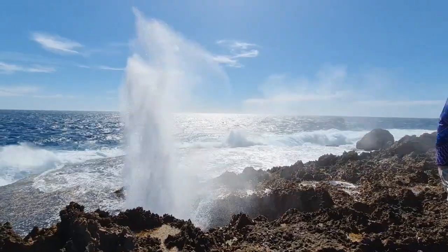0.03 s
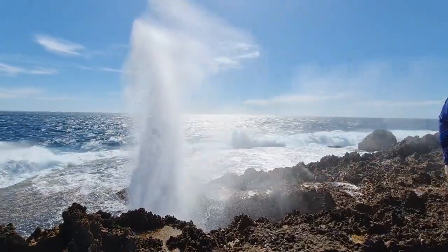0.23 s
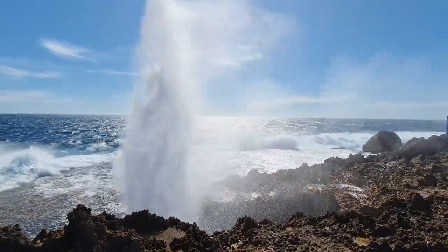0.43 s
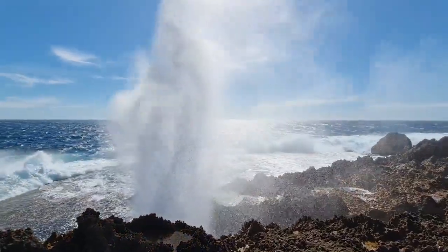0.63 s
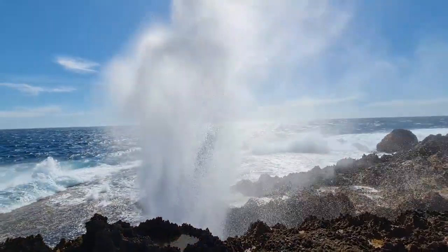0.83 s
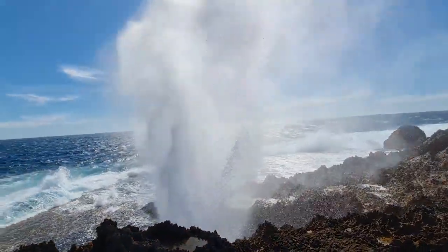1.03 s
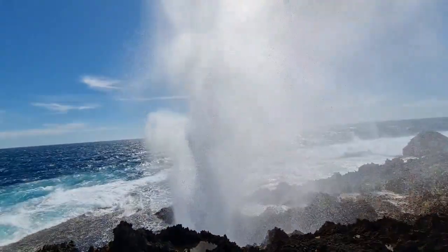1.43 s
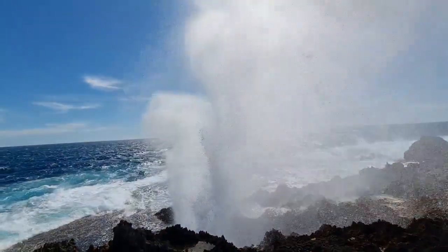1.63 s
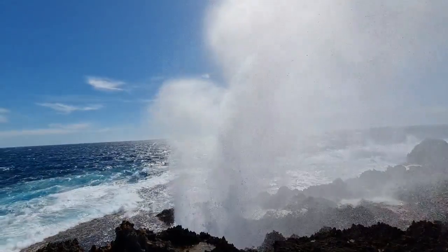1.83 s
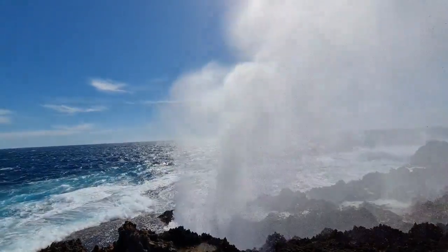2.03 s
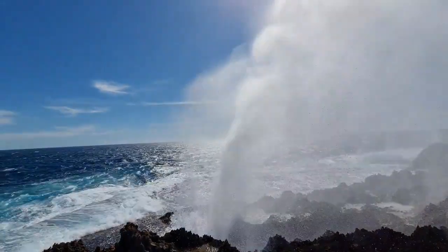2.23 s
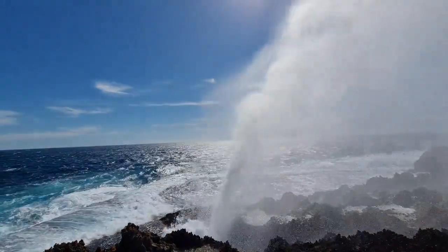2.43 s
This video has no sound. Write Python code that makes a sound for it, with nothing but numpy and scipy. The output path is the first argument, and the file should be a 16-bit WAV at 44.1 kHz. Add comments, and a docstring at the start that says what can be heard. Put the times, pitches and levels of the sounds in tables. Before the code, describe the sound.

A blowhole on a rocky shore throbs hollowly and hisses, then bellows out a roaring jet of spray. Water splashes back onto the rocks, while surf washes steadily and wind buffets the microphone.

```python
"""Rocky shore with a blowhole. Slugs of air and water ring the shaft in hollow throbs and air
hisses through cracks; then the hole bellows and fires a roaring jet of spray. Water gushes,
slaps and falls back on the rocks, and air squeals through it as it drains. Mist hisses over
steady surf throughout, while wind buffets the two ports of the microphone."""
import sys
import numpy as np
from scipy import signal
from scipy.fft import rfft, irfft
from scipy.io import wavfile
from scipy.ndimage import uniform_filter1d

SR = 44100
rng = np.random.default_rng(int(sys.argv[2]) if len(sys.argv) > 2 else 0)


def persist_wave(psi):
    """Save psi, clipped to +-1, as 16-bit WAV."""
    counts = np.round(np.clip(psi, -1, 1) * 32767).astype(np.int16)
    wavfile.write(sys.argv[1], SR, np.atleast_2d(counts).T)


N = 114660
TIME_S = np.arange(N) / SR

# near-zero curve for coherence, phase or balance: freq_hz, value
NEAR_ZERO = [(20, 0.011), (16000, 0.012)]
# left-right likeness of the shore's noises: freq_hz, coherence
SHORE_COHERENCE = [(100, 0.96), (350, 1), (700, 0.054), (1100, 0.13), (1700, 0.2), (2600, 0.28),
                   (4000, 0.083), (9000, .05)]
# stereo lean of rising and falling spray: freq_hz, left_minus_right_db
SPRAY_BALANCE = [(200, 10), (700, 7), (1100, -0.5), (1700, 3.5), (3000, 1), (5500, 2.5), (6700, 11),
                 (7900, 15), (9500, 12), (13000, 4)]


def amp(db):
    return 10 ** (np.asarray(db) / 20)


def unit_rms(x):
    return x / np.sqrt(np.mean(x ** 2) + 1e-20)


def at_freq(curve, hz):
    freq_hz, value = np.transpose(curve)
    return np.interp(np.log(hz + 1), np.log(freq_hz + 1), value)


def envelope(curve):
    """Gain over time for each dB column."""
    time_s, *columns_db = np.transpose(curve)
    return amp([np.interp(TIME_S, time_s, db) for db in columns_db])


def swell(length_s):
    return np.sin(np.pi * np.arange(0, length_s, 1 / SR) / length_s) ** 2


def add(mix, start_s, sound):
    part = mix[:, max(round(start_s * SR), 0):][:, :sound.shape[1]]
    part += sound[:, :part.shape[1]]


def colour(x, spectrum):
    """Filter by a spectrum, to unit RMS."""
    gain = amp(at_freq(spectrum, np.fft.rfftfreq(N, 1 / SR)))
    return unit_rms(irfft(rfft(x) * gain, N))


def steadied(x, samples):
    """Hold the running RMS near one."""
    power = uniform_filter1d(uniform_filter1d(x ** 2, samples), samples)
    return x / np.sqrt(power + 1e-12)


def drone(spectrum, coherence):
    """Stereo noise of even strength."""
    left, other = rng.standard_normal((2, N))
    right = coherence * left + np.sqrt(1 - coherence ** 2) * other
    return steadied(colour(np.array([left, right]), spectrum), samples=2600)


def rush(spectrum, coherence, patchy_db, flicker_db, phase=NEAR_ZERO, balance=NEAR_ZERO):
    """Turbulent stereo noise with drifting patches and a flicker shared by all bands."""
    frames, hz = N // 128 + 6, np.fft.rfftfreq(512, 1 / SR)
    a, b, c, d, patches = rng.standard_normal((5, frames, len(hz)))
    patches = unit_rms(uniform_filter1d(uniform_filter1d(patches, 12, axis=0), 6, axis=1))
    flicker = rng.standard_normal(frames)
    flicker = unit_rms(uniform_filter1d(flicker, 5) - uniform_filter1d(flicker, 40))
    alike = np.clip(at_freq(coherence, hz), -1, 1)
    left, other = a + 1j * b, c + 1j * d
    right = (alike * left + np.sqrt(1 - alike ** 2) * other) * np.exp(-1j * at_freq(phase, hz))
    lean = amp(at_freq(balance, hz) / 2)
    bins = np.array([left * lean, right / lean]) / np.hypot(lean, 1 / lean)
    bins *= amp(patchy_db * patches + flicker_db * flicker[:, None])
    _, noise = signal.istft(bins.transpose(0, 2, 1), nperseg=512, noverlap=384)
    return colour(noise[:, :N], spectrum)


def wind():
    """Lumpy eddies rumble on each port; a buffet is one rough swing of pressure on both."""
    # eddy and buffet-grit spectra: freq_hz, density_db
    eddy_spectrum = [(15, -34), (35, -6.5), (60, -6.5), (120, -1), (180, -9), (300, -12.5), (500, -17),
                     (900, -31.5), (2500, -89)]
    grit_spectrum = [(15, -22), (35, -11), (60, -2.5), (115, -12.5), (180, -19.5), (400, -21), (900, -30),
                     (2500, -90)]
    # eddy strength: time_s, left_db, right_db
    eddy_levels = [(0, -24, -48), (.09, -25.5, -36), (.28, -29, -28), (.39, -19.5, -32), (.44, -28, -38),
                   (.53, -30.5, -26), (.7, -27.5, -46), (.84, -27, -25.5), (1.0, -30, -19.5),
                   (1.1, -53, -34.5), (1.35, -29.5, -19), (1.6, -25, -26.5), (1.78, -22, -25),
                   (2.0, -40, -23.5), (2.25, -31, -24), (2.34, -22, -31), (2.45, -45, -31),
                   (2.6, -40, -35.5)]
    # single buffets: centre_s, left_db, right_db
    buffet_events = [(0.096, -32, -27), (0.398, -29, -27), (0.482, -28, -25.5), (0.818, -21, -24.5),
                     (.864, -23, -29), (1.031, -25, -22), (1.201, -28, -19), (1.262, -32, -23.5),
                     (1.336, -21, -33), (1.381, -23, -15), (1.432, -24, -23), (1.699, -22, -23),
                     (1.805, -26, -25), (1.892, -20, -19), (1.965, -15, -26), (2.023, -19.5, -24),
                     (2.095, -17.5, -20), (2.182, -22, -22), (2.28, -38, -17.5)]
    buffet_s, swing_hz, spread_rad, lump_db = 0.055, 62, 1.4, 3.5
    buffets, shape = np.zeros((2, N)), swell(buffet_s)
    t = TIME_S[:len(shape)]
    grit = steadied(drone(grit_spectrum, coherence=0.17), samples=1100)
    for centre_s, left_db, right_db in buffet_events:
        offset, lag, detune = rng.standard_normal(3)
        phase = 2 * np.pi * (swing_hz * np.exp(0.18 * detune) * t + offset)
        swing = 0.88 * np.sin([phase, phase + spread_rad * lag])
        swing += 1.2 * grit[:, round(centre_s * SR):][:, :len(t)]
        add(buffets, centre_s - buffet_s / 2, amp([[left_db], [right_db]]) * shape * swing)
    lumps = unit_rms(uniform_filter1d(uniform_filter1d(rng.standard_normal((2, N)), 700), 500))
    eddies = unit_rms(drone(eddy_spectrum, coherence=0.091) * amp(lump_db * np.clip(lumps, -2, 2)))
    return eddies * envelope(eddy_levels) + buffets


def surf():
    """Steady wash of the sea."""
    # surf noise: freq_hz, density_db
    spectrum = [(20, -38), (120, -4.5), (330, 1.5), (600, -5), (900, -5.5), (1400, -21), (2200, -26.5),
                (2700, -12.5), (3300, -26.5), (4700, -22.5), (6000, -27), (7200, -44), (9000, -74.5),
                (13000, -34)]
    return amp(-38) * rush(spectrum, SHORE_COHERENCE, patchy_db=2.5, flicker_db=1.74)


def mist():
    """Fine drifting mist hisses in the high treble."""
    # mist hiss: freq_hz, density_db
    spectrum = [(3000, -40), (7000, -16), (9000, -16), (10200, -10), (11500, -2), (13000, -3), (15800, -5)]
    # mist strength: time_s, level_db
    levels = [(0, -60), (.2, -61), (.35, -58), (.7, -58.5), (.9, -56), (1.15, -56.5), (1.45, -52.5),
              (1.84, -56.5), (1.89, -49), (1.94, -55.5), (2.4, -54.5), (2.6, -51.5)]
    # stereo lean: freq_hz, left_minus_right_db
    balance = [(5000, 6), (7900, 15), (10000, 5), (13000, 0.5)]
    return envelope(levels) * rush(spectrum, NEAR_ZERO, patchy_db=-1.7, flicker_db=1.0, balance=balance)


def crack_hiss():
    """Air hisses through cracks in the rock before the eruption."""
    # hiss bands: freq_hz, density_db
    spectrum = [(1300, -30), (1650, 3.5), (1900, 7.5), (2120, -5), (2650, 2.5), (2850, -19), (3050, -26),
                (3700, -13), (4400, -1.5), (4820, 0.5), (5250, -24), (6000, -31), (7500, -29), (9000, -38)]
    # hiss strength: time_s, level_db
    levels = [(0, -58), (.12, -47.5), (.3, -47.5), (.6, -52.5), (.9, -52), (1.3, -66), (2.6, -64)]
    return envelope(levels) * rush(spectrum, SHORE_COHERENCE, patchy_db=3, flicker_db=1.0)


def shaft():
    """Slugs of air and water ring the rock shaft in quick throbs over its hollow hum."""
    # shaft resonance: freq_hz, density_db
    hum_spectrum = [(150, -10), (220, -0.5), (265, 9), (310, 4.5), (420, -11), (700, -49.5)]
    # hum strength: time_s, level_db
    hum_levels = [(0, -33), (.3, -28), (.68, -33.5), (.8, -23.5), (1.15, -27), (1.35, -26), (1.6, -34),
                  (1.9, -27), (2.25, -27.5), (2.6, -39.5)]
    # throbs of air: centre_s, level_db, pitch_hz
    throbs = [(0.075, -27, 272.6), (0.213, -21, 256), (0.256, -17, 267.7), (0.311, -18.5, 267),
              (0.367, -20.5, 256.5), (0.544, -20, 257), (0.622, -23.5, 250), (0.765, -14.5, 257),
              (0.808, -19, 268.7), (0.854, -15.5, 254), (0.906, -13.5, 260.4), (0.976, -30, 273.5),
              (1.281, -19, 277), (1.325, -16.5, 245.3), (1.359, -15, 266), (1.415, -16.5, 268.4),
              (1.474, -14, 263.7), (1.522, -17, 242.8), (1.566, -10, 243.6), (1.62, -10.5, 246),
              (1.691, -18, 255), (1.783, -18.5, 272), (1.873, -20, 273.4), (2.177, -17, 249.5)]
    throb_s, skew, spread_rad = 0.052, 0.94, 0.41
    out = drone(hum_spectrum, coherence=0.17) * envelope(hum_levels)
    progress = np.arange(0, throb_s, 1 / SR) / throb_s
    shape = np.sin(np.pi * progress ** skew) ** 2
    for centre_s, level_db, pitch_hz in throbs:
        offset, lag, glide = rng.standard_normal(3)
        glide_hz = pitch_hz * (1 + 0.16 * glide * (progress - 0.5))
        phase = 2 * np.pi * (np.cumsum(glide_hz) / SR + offset)
        tone = np.sin([phase, phase + spread_rad * lag])
        add(out, centre_s - throb_s / 2, amp(level_db) * shape * tone)
    return out


def splashes():
    """Soft gushes of spray and hard slaps of water on rock, as bursts of one noise."""
    # gushes: centre_s, length_s, level_db, left_minus_right_db
    gushes = [(0.368, .05, -36, -3), (0.861, 0.071, -36.5, -6), (1.082, 0.078, -32, 5),
              (1.205, .04, -33.5, -5), (1.3, .04, -30, 12), (1.89, .06, -30.5, 2), (1.972, 0.036, -24, 3),
              (2.19, .07, -31.5, 8)]
    # slaps: start_s, peak_db
    slaps = [(.744, -26), (.833, -26.5), (1.084, -27), (1.446, -26), (1.957, -24), (2.079, -25)]
    # splash noise: freq_hz, density_db
    spectrum = [(120, -25), (250, 2), (480, 4), (750, 0.5), (1100, -1), (1700, -10), (2400, -13),
                (3500, -24), (5000, -30), (8000, -52), (13000, -53)]
    slap_rise_s = 0.0011
    gain = np.zeros((2, N))
    for centre_s, length_s, level_db, lean_db in gushes:
        sides = amp([[level_db + lean_db / 2], [level_db - lean_db / 2]])
        add(gain, centre_s - length_s / 2, sides * np.sqrt(swell(length_s)))
    age = TIME_S[None, :SR // 20] / slap_rise_s
    for start_s, peak_db in slaps:
        add(gain, start_s, amp(peak_db) * age * np.exp(1 - age))
    return gain * rush(spectrum, SHORE_COHERENCE, patchy_db=2, flicker_db=1.2)


def eruption():
    """A deep bellow from the hole and the jet of spray above it, brighter as it speeds up."""
    # jet and bellow spectra: freq_hz, density_db
    jet_spectrum = [(200, -22), (450, -8.5), (650, -11), (930, -1), (1380, -6), (1680, -13.5), (1950, -9),
                    (2220, -12), (2500, -19.5), (2800, -16), (3400, -24), (3900, -23), (4400, -23.5),
                    (4700, -30.5), (5400, -33.5), (5950, -34), (6400, -44.5), (7500, -44), (9000, -55),
                    (13000, -50)]
    bellow_spectrum = [(120, -11), (185, -9), (225, 1), (335, 2), (420, 2.5), (520, -10.5), (650, -31.5),
                       (1000, -68)]
    # their strengths: time_s, level_db
    jet_levels = [(0, -46.5), (.6, -49.5), (.76, -38), (.87, -35.5), (1.0, -36.5), (1.14, -35), (1.24, -34),
                  (1.3, -28.5), (1.38, -27), (1.45, -22.5), (1.62, -22.5), (1.71, -25), (1.79, -39.5),
                  (2.2, -36), (2.4, -48), (2.6, -73)]
    bellow_levels = [(0, -54), (.7, -46), (.85, -33), (1.22, -32.5), (1.32, -23.5), (1.5, -19.5),
                     (1.61, -13), (1.7, -19.5), (1.77, -16), (1.86, -25.5), (2.07, -32), (2.19, -22),
                     (2.4, -36), (2.6, -45)]
    # jet left-right likeness: freq_hz, coherence
    coherence = [(100, 0.5), (700, .7), (1000, 0.59), (1400, 0.46), (1700, 0.89), (2200, 0.27),
                 (4000, 0.74), (6000, 1), (8000, .2), (15000, .1)]
    # jet stereo phase: freq_hz, left_lead_rad
    phase = [(20, 0), (600, .1), (1000, .5), (1400, 1.5), (1700, 3.1), (1900, 5.8), (2350, 7.3),
             (2600, 6.3), (3050, 7.7), (3500, 6.3), (4300, 6.4), (5000, 10), (6000, 12.6), (9000, 19)]
    treble_hz, treble_db_per_db = 1450, 0.26
    jet = rush(jet_spectrum, coherence, patchy_db=1.5, flicker_db=0.03, phase=phase, balance=SPRAY_BALANCE)
    force = envelope(jet_levels)
    body = signal.sosfiltfilt(signal.butter(2, treble_hz, fs=SR, output="sos"), jet)
    treble = (jet - body) * (force / force.max()) ** treble_db_per_db
    bellow = drone(bellow_spectrum, coherence=0.87) * envelope(bellow_levels)
    return (body + treble) * force + bellow


def falling_water():
    """Sheets of water land on the rocks, with separate splats among them."""
    # water on rock: freq_hz, density_db
    spectrum = [(200, -12), (480, 4), (720, -7.5), (1100, -2), (1750, -12.5), (2300, -9.5), (2750, -12),
                (3100, -16.5), (3480, -13.5), (3950, -23), (4400, -20.5), (5200, -34), (7000, -39),
                (9000, -49)]
    # fall strength: time_s, level_db
    levels = [(0, -49), (.7, -50), (.85, -37), (1.3, -39.5), (1.7, -30), (1.82, -27.5), (2.01, -30),
              (2.065, -36), (2.14, -28), (2.26, -32), (2.33, -34), (2.6, -40)]
    splats_per_s, spread_db, splats_vs_sheet_db = 760, 0.5, -7.5
    sheet = rush(spectrum, SHORE_COHERENCE, patchy_db=4.0, flicker_db=2.5, balance=SPRAY_BALANCE)
    lands = rng.random(N) < splats_per_s / SR
    size_db = spread_db * np.minimum(rng.exponential(1, N), 4.5)
    pan_rad = rng.uniform(0, 0.58, N)
    hits = lands * amp(size_db) * rng.choice([-1, 1], N)
    splats = colour(hits * np.array([np.cos(pan_rad), np.sin(pan_rad)]), spectrum)
    return unit_rms(sheet + amp(splats_vs_sheet_db) * splats) * envelope(levels)


def squeals():
    """Air squeals through draining water in wobbling, falling tones."""
    # squeals: centre_s, length_s, pitch_hz, level_db
    events = [(1.885, .06, 2250, -37), (2.005, .08, 2530, -40)]
    sag_hz_per_s, wobble_hz = 6000, 170
    out = np.zeros((2, N))
    for centre_s, length_s, pitch_hz, level_db in events:
        shape = np.sqrt(2 * swell(length_s))
        from_centre_s = TIME_S[:len(shape)] - length_s / 2
        wobble = unit_rms(uniform_filter1d(rng.standard_normal(N), 60))[:len(shape)]
        glide_hz = pitch_hz - sag_hz_per_s * from_centre_s + wobble_hz * wobble
        tone = np.sin(2 * np.pi * np.cumsum(glide_hz) / SR)
        add(out, centre_s - length_s / 2, amp(level_db) * shape * tone[None])
    return out


def scene():
    blowhole = shaft() + eruption() + squeals() + splashes() + falling_water()
    return blowhole + surf() + mist() + crack_hiss() + wind()


def record(dry):
    """Steep low-pass band limit."""
    cutoff_hz = 15850
    taps = signal.firwin(511, cutoff_hz, window=("kaiser", 9), fs=SR)
    return signal.oaconvolve(dry, taps[None], "same")


dry = scene()
out = record(dry)
persist_wave(out)
```